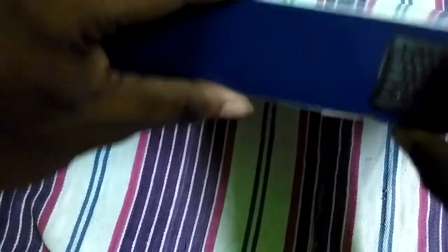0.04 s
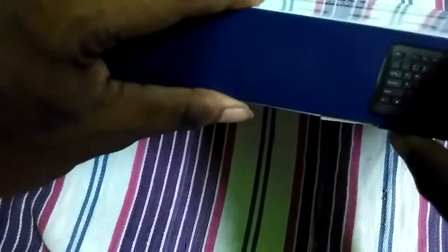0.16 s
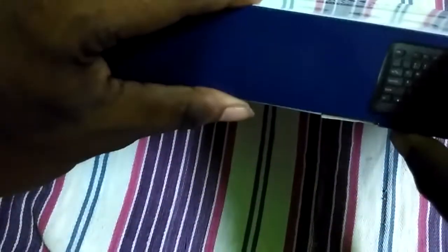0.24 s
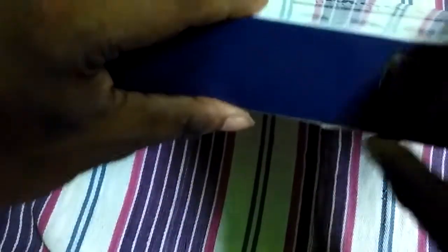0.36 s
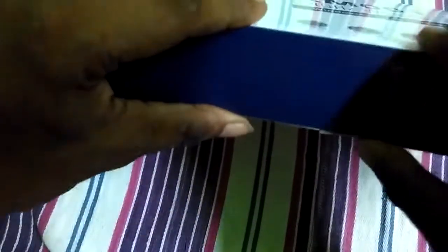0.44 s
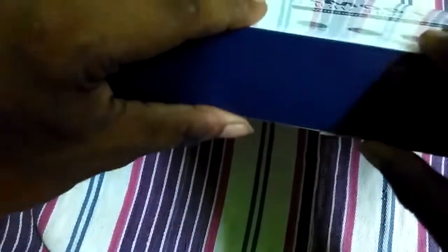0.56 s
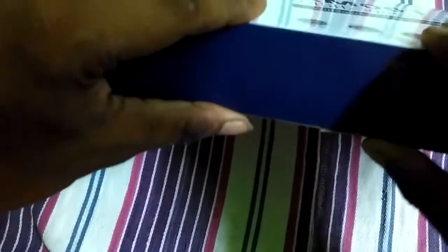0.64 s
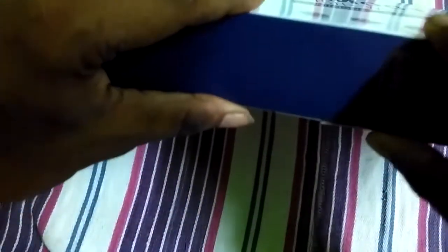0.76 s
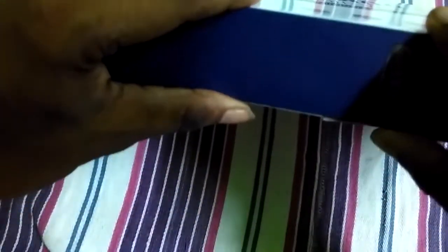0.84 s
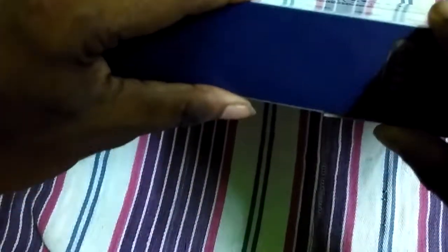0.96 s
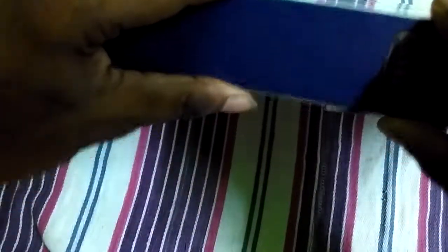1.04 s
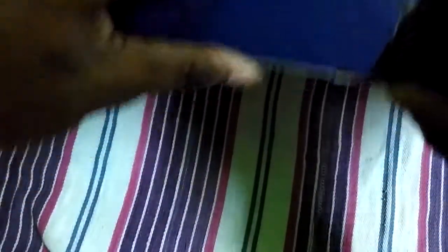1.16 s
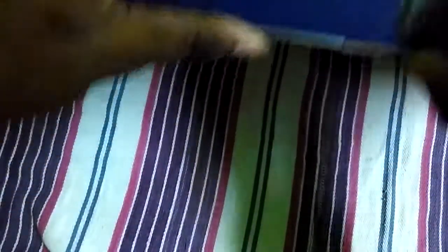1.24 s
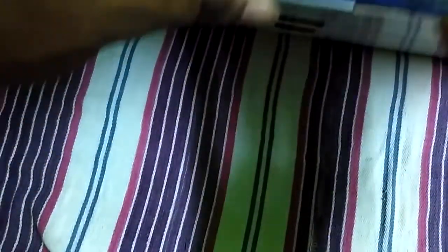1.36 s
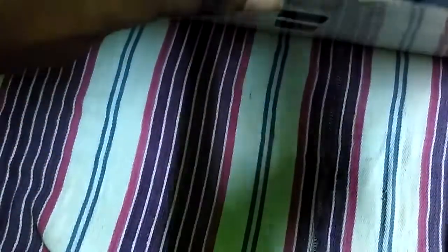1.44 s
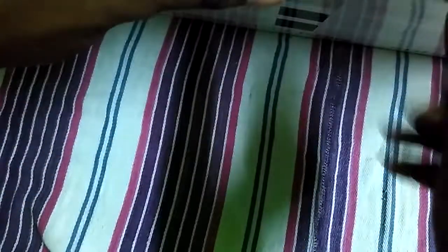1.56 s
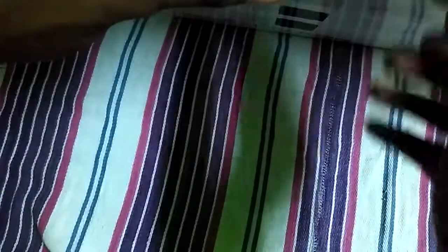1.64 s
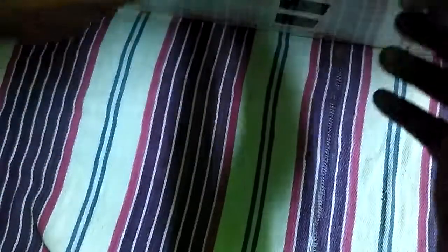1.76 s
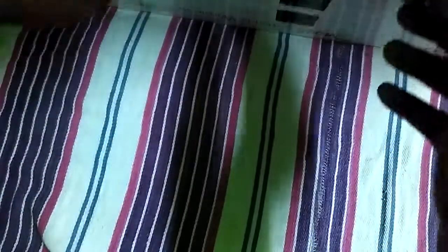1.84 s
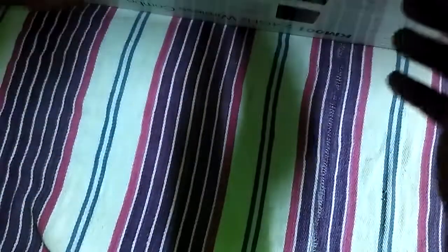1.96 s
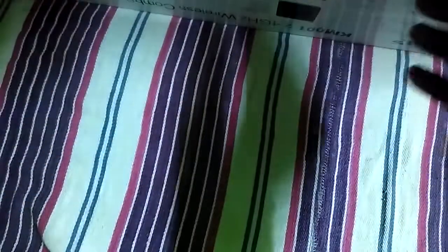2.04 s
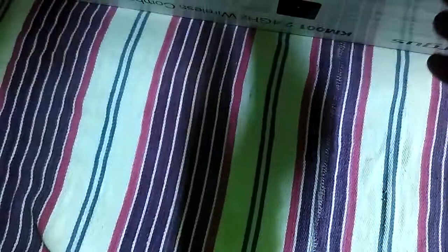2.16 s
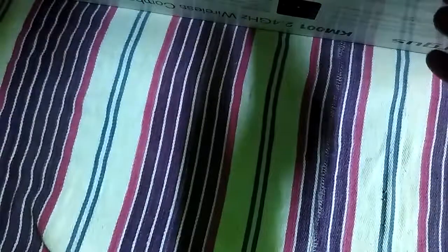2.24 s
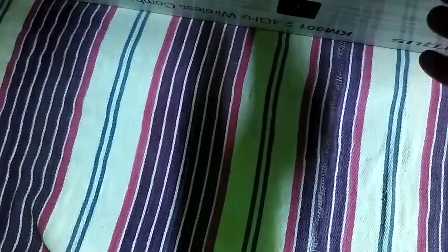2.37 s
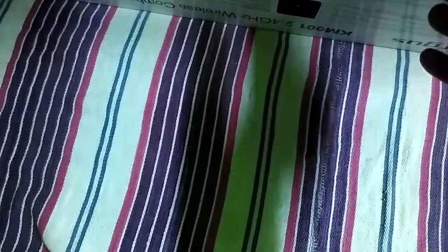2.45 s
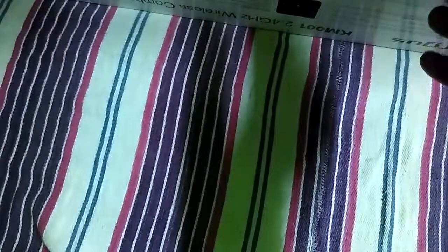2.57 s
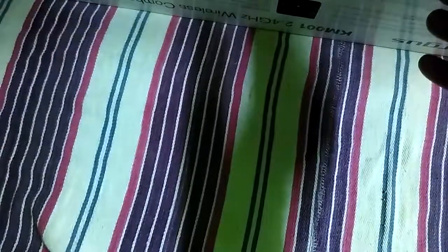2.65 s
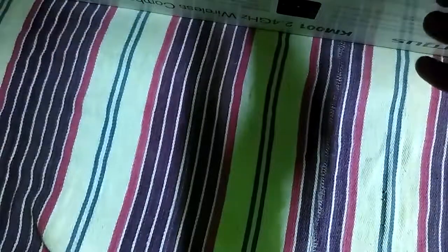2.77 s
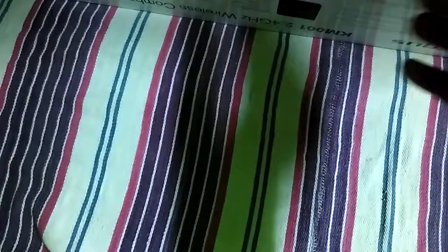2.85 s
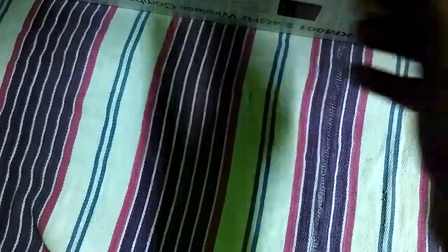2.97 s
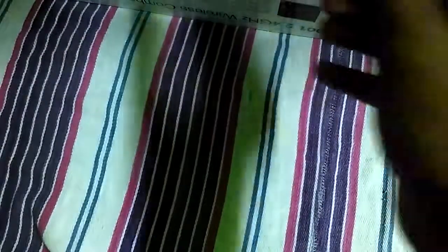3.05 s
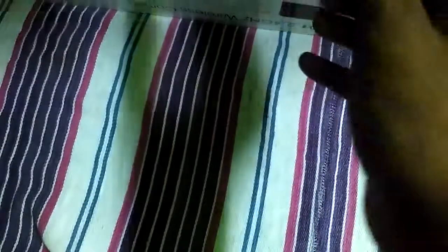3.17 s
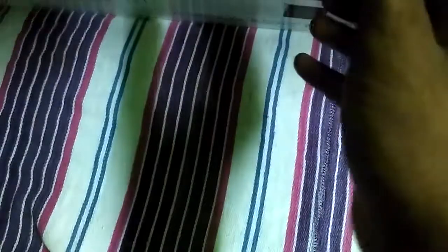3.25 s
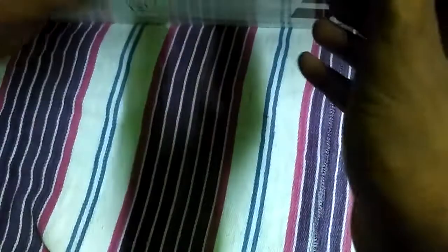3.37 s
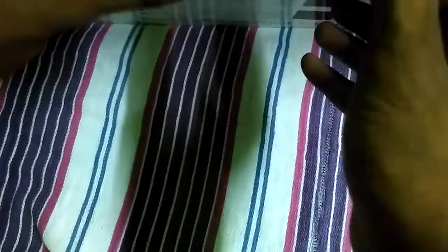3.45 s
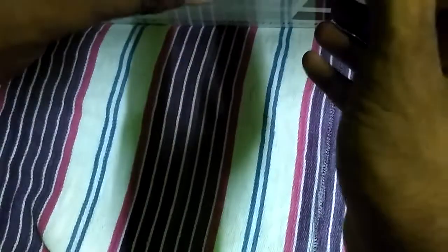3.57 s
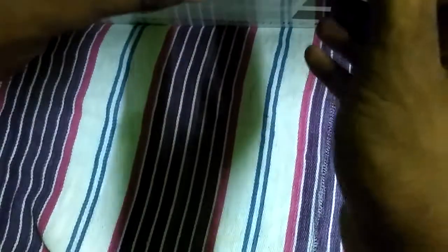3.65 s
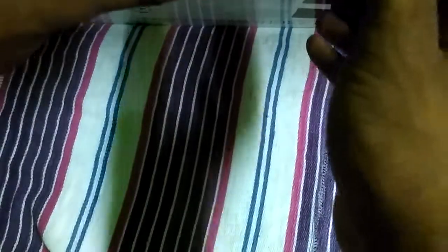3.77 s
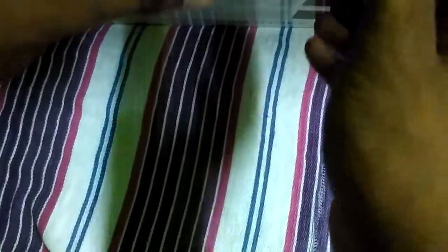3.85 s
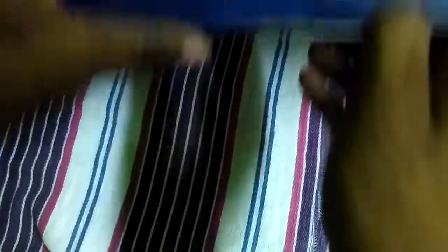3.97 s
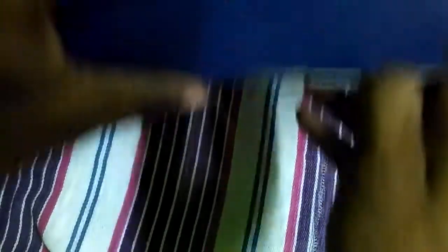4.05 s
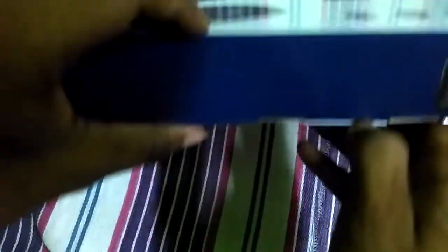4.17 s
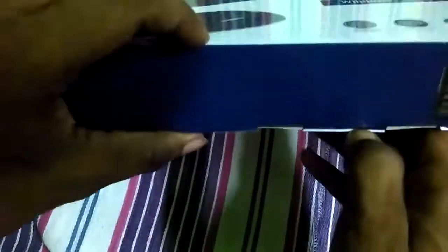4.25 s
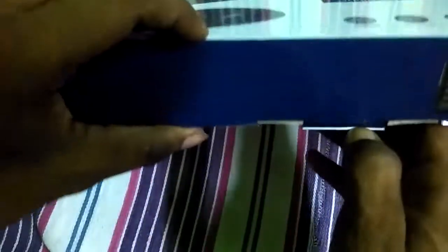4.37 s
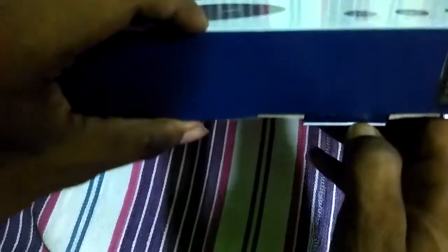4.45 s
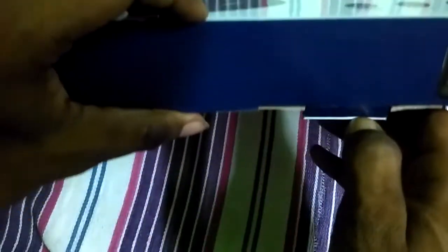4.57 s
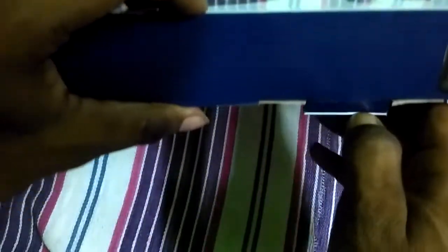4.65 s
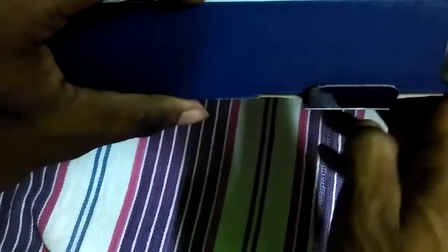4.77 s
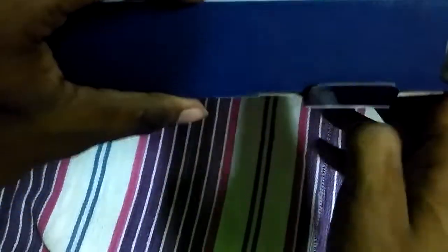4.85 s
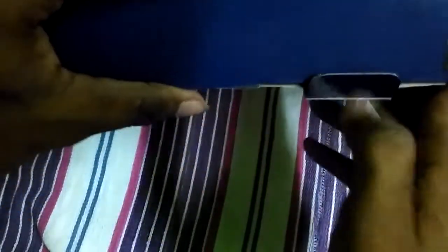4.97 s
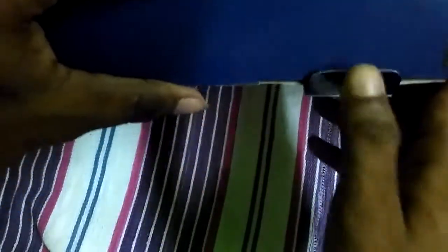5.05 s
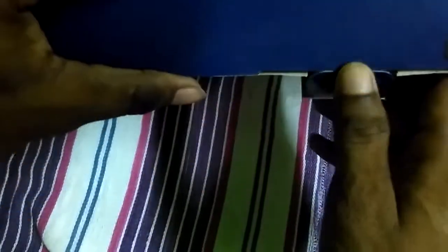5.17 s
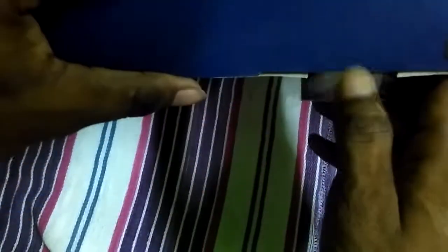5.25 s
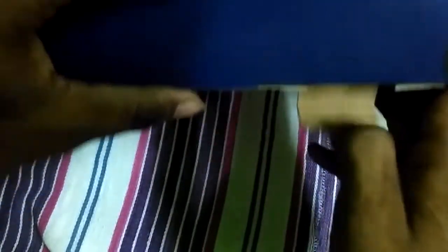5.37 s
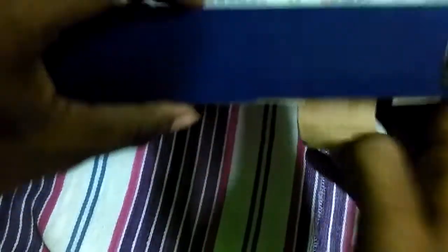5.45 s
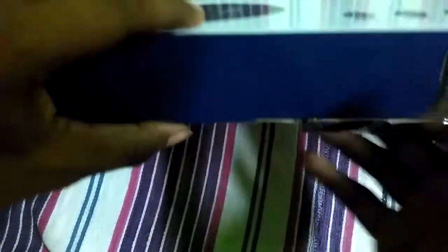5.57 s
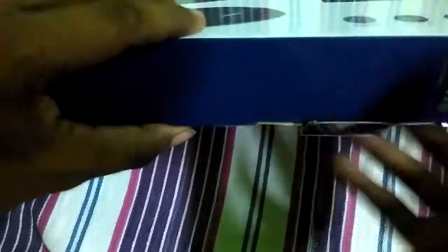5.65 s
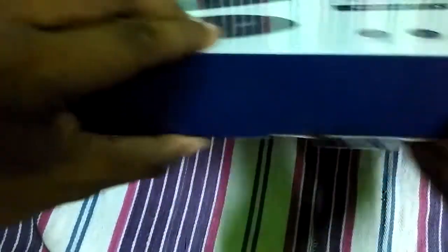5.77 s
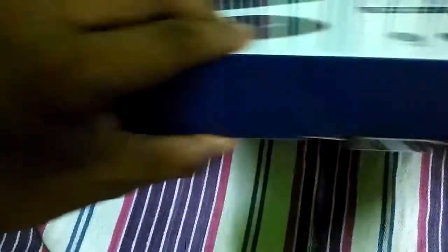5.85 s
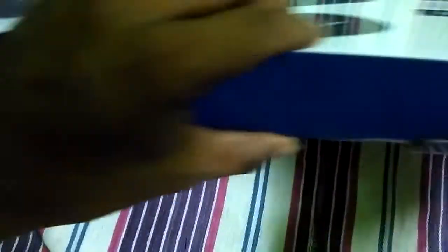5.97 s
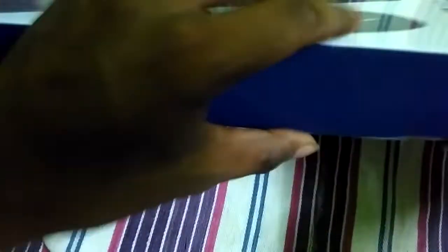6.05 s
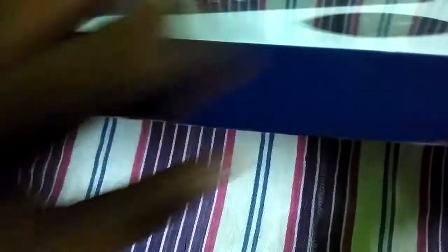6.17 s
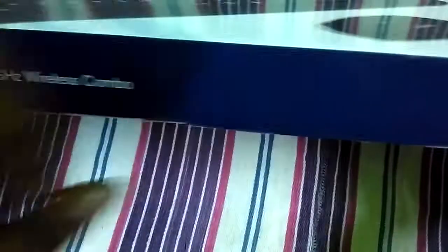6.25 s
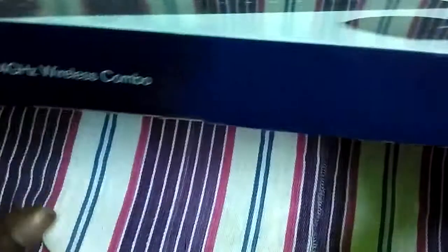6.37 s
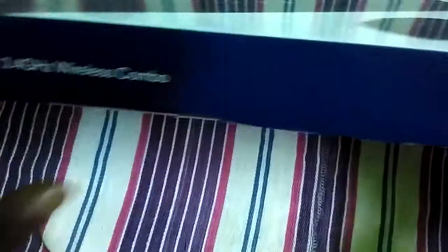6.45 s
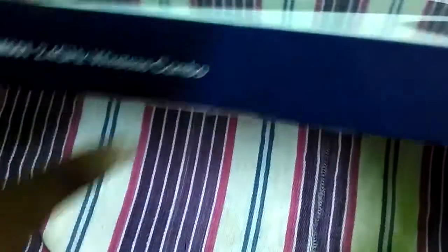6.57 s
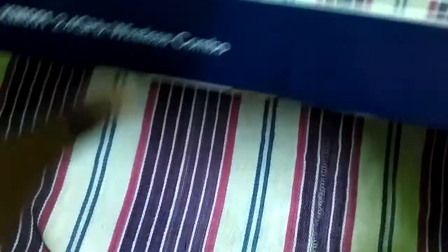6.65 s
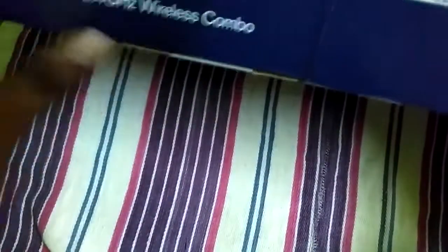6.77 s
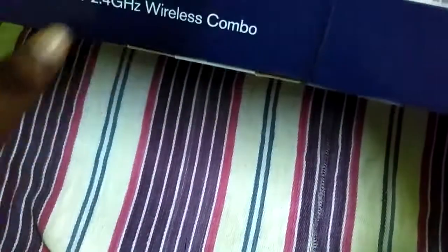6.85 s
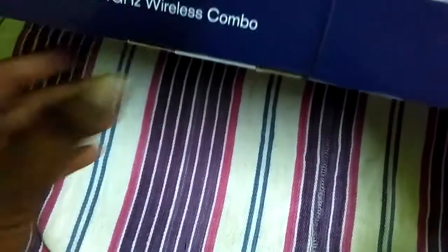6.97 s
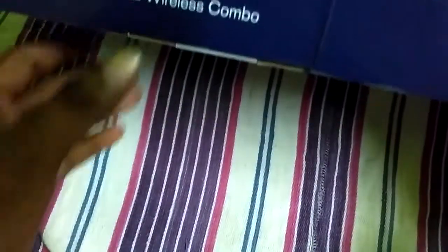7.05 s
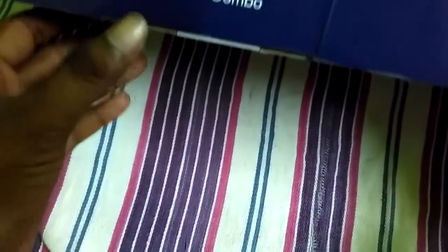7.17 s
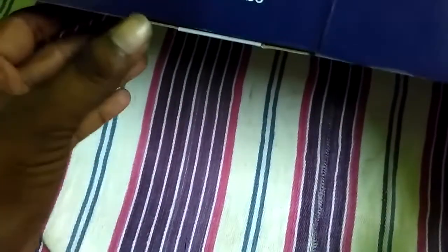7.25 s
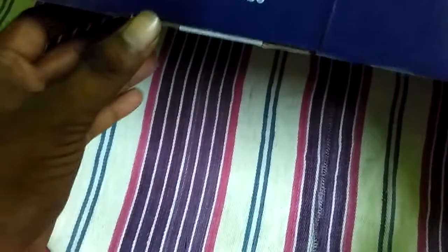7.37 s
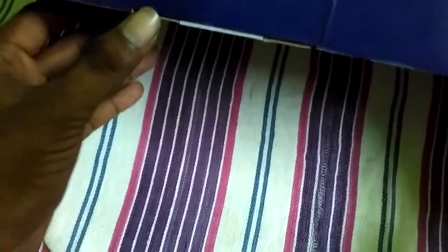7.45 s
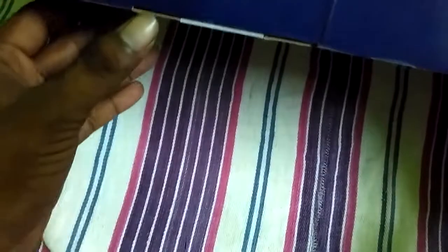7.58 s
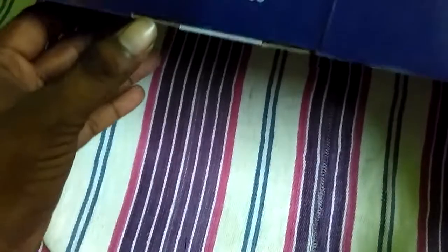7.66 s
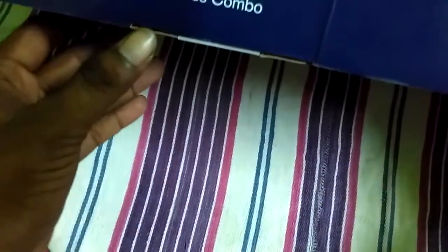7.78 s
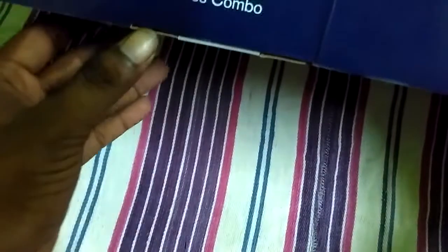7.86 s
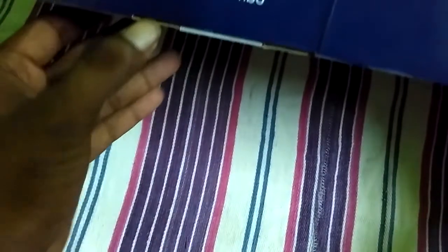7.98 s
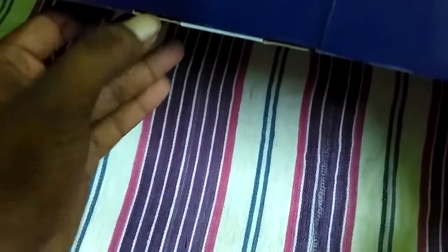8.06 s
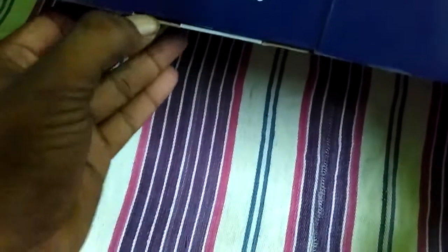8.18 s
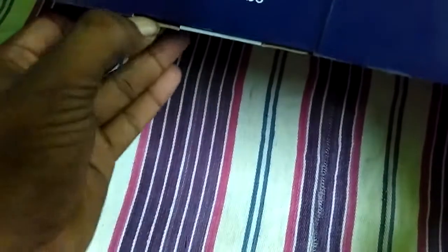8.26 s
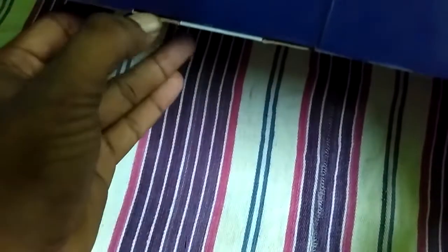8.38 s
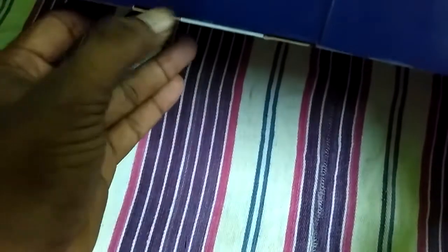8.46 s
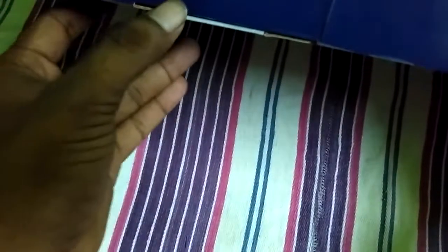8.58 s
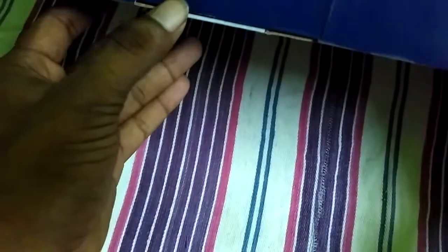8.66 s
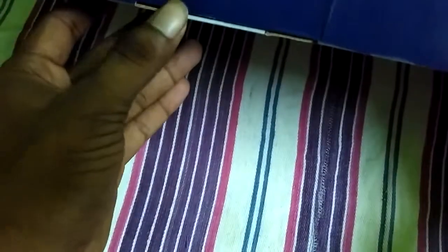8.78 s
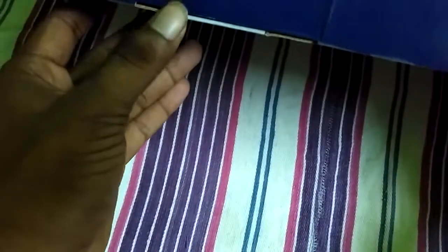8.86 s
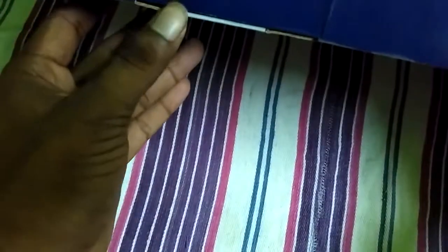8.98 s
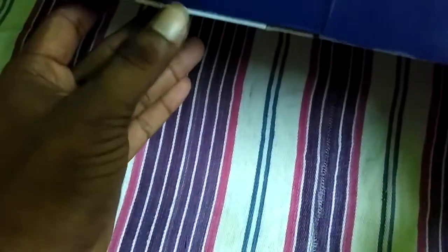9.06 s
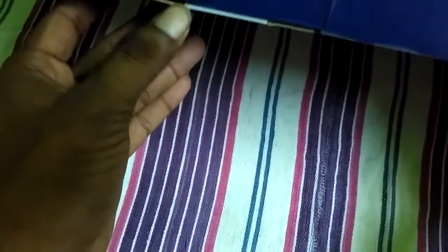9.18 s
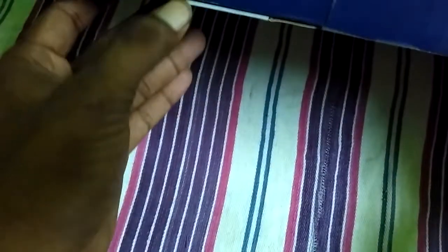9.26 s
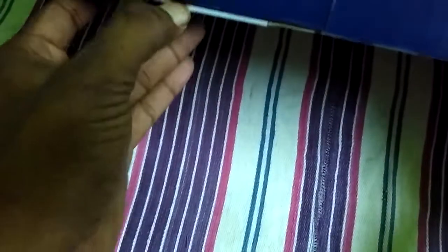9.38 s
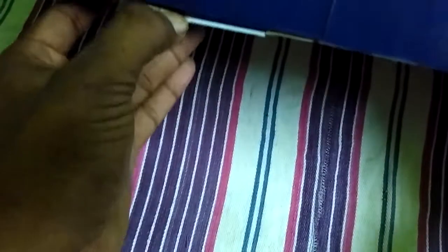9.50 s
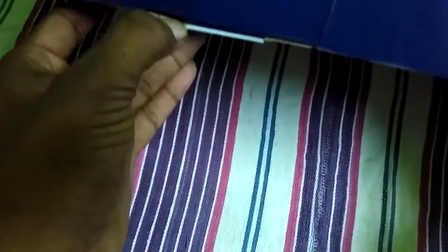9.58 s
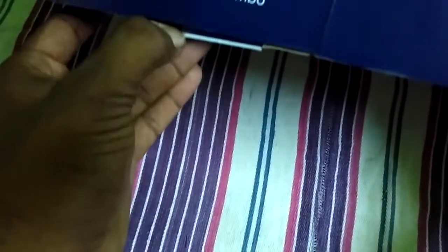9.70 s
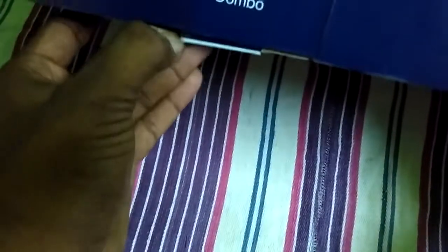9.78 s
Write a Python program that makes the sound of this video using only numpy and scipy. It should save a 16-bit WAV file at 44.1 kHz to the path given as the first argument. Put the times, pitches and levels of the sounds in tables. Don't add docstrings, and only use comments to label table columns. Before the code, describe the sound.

In a small room with a steady, throbbing low fan hum, hands turn a hollow cardboard box close to the microphone. Soft skin rubbing and nail ticks come first, then scattered hollow knocks. Midway a flap is dragged out with loud, gritty scrapes and cracks; later skin squeaks briefly and a fold creaks. After quieter touches, one hard blow lands near the end.

```python
import sys
import numpy as np
from scipy import signal
from scipy.fft import rfft, irfft, next_fast_len
from scipy.io import wavfile
from scipy.ndimage import uniform_filter1d

SR = 44100
rng = np.random.default_rng(int(sys.argv[2]) if len(sys.argv) > 2 else 0)


def boost_factor(decibels):
    exponent = np.asarray(decibels, float) / 20
    return 10 ** exponent


def generate_wav(signal):
    frames = np.transpose(np.atleast_2d(signal))
    scaled = np.clip(frames, -1, 1) * 32767
    pcm = np.round(scaled).astype(np.int16)
    wavfile.write(sys.argv[1], SR, pcm)


N = 433503

# [f/Hz, width/Hz, level/dB]
BOX_MODES = [
    (60.3, 16, -13),
    (141, 81, -7.5),
    (298, 120, 0),
    (473, 185, 3),
    (664.5, 393, 0),
    (997, 534, 1.5),
    (1214, 465, -1.5),
    (1900, 700, -10),
    (2590, 940, -10),
    (3600, 1100, -15),
]
# [f/Hz, level per Hz/dB]
SCRAPE_COLOUR = [(300, -28), (1500, -4), (2800, -11.5), (4000, -6.5), (5300, -4.5), (7000, -5.5),
                 (9000, -2.5), (12000, -3), (15000, -6.5)]
# [f/Hz, level per Hz/dB]
SKIN_COLOUR = [(1500, -27), (3200, -11), (6000, -8), (10000, -3), (13500, -5.5), (15500, -8)]
# [f/Hz, level per Hz/dB]
AIR_COLOUR = [(20, -30), (45, -8.5), (70, -4.5), (100, -4), (130, -2), (165, -3.5), (210, -11.5),
              (240, -14), (400, -19.5), (800, -31), (1400, -37), (4200, -50), (10900, -48), (14500, -40)]
# [f/Hz, width/Hz, level/dB]
MOTOR_LINES = [(292, 7.7, -80.5), (414.4, 20, -88.5), (539.2, 8.9, -85.5)]
# [f/Hz, share/1]
PORT_LIKENESS = [(60, 0.89), (130, 0.98), (300, 0.77), (650, 0.39), (1400, 0.13), (3000, 0.01)]
# [t/s, lag/ms]
HAND_PLACES = [(0, -0.052), (1.3, 0.075), (1.48, -0.079), (1.95, -0.12), (2.3, -0.054), (3.3, 0.066),
               (3.9, 0.0042), (4.02, 0.097), (4.4, 0.0099), (5.76, 0.084), (6.188, -0.029), (6.21, -0.2),
               (6.42, -0.22), (6.517, 0.17), (6.63, -0.27), (6.79, 0.18), (7.64, 0.088), (9.83, 0.16)]
# [t/s, crack level/dB, knock level/dB, crack left-right/dB]
EDGE_TICKS = [(0.1761, -22.5, -25, 8.5), (0.3151, -33.5, -55, 0), (3.7195, -33.5, -59, 7.5),
              (3.7882, -29, -49, -3), (3.9572, -34, -55, 3), (4.4149, -37.5, -50, 9), (4.4334, -30, -40, 4)]
# [t/s, crack level/dB, knock level/dB, crack left-right/dB]
SIDE_KNOCKS = [(0.4064, -57, -43.5, -5), (1.506, -29, -43.5, 10), (1.8812, -46, -50.5, 3),
               (1.9083, -28, -33, -15), (2.0763, -65, -57, 4), (3.8074, -37, -49, 7),
               (3.8239, -32, -42, -10), (3.8409, -27, -43.5, 3), (3.9953, -72, -49, 12),
               (4.798, -21, -25.5, 10), (4.8594, -17.5, -10.5, 20), (5.3842, -34.5, -27, 18),
               (6.1197, -37, -42.5, 13), (6.4057, -43.5, -42, -2), (6.6304, -48, -54, -9),
               (6.6412, -46.5, -44, 11.5), (7.6214, -70.5, -60, -8.5), (7.64, -29.5, -37, -5),
               (8.4821, -54, -47, -2.5), (8.5082, -46, -51.5, 12), (8.8913, -42.5, -49, 6.5),
               (8.9147, -32.5, -49, 6), (9.1905, -13.5, -12.5, -1.6), (4.8325, -24, -18, 11),
               (4.8055, -27, -40, 6), (6.126, -50, -44, 4), (4.517, -42, -45, 5), (5.991, -60, -58, 4),
               (5.966, -60, -60, 4)]
# [t/s, crack level/dB, knock level/dB, crack left-right/dB]
FACE_KNOCKS = [(1.305, -55, -43, 6), (1.4955, -38.5, -43, 12), (2.9146, -41.5, -46.5, -5),
               (4.0222, -50, -37.5, 13), (4.4553, -26.5, -34.5, 8), (4.5385, -29, -36, 5.5),
               (4.5908, -28, -33.5, 1), (4.6923, -20, -29, 0.5), (5.2715, -22.5, -32.5, -1),
               (5.3756, -46, -38, -9), (5.549, -42.5, -40, 12), (5.5663, -33.5, -41, 1),
               (5.5955, -29.5, -43, 5.5), (5.7565, -40, -40, -6), (6.0236, -48, -48, -9),
               (6.1393, -36, -36, -8), (6.3568, -32.5, -37.5, 2), (6.5237, -24.5, -23.5, 7),
               (6.76, -45, -47, -1.5), (6.7993, -31.5, -35.5, -6), (7.1827, -38, -40, 9),
               (8.0753, -48.5, -59, 7), (8.6284, -41.5, -36.5, 13.5), (9.169, -37, -39, -2.5),
               (9.1772, -24.5, -28, 2)]
# [t/s, crack level/dB, knock level/dB]
PAD_TOUCHES = [(0.092, -83, -49), (0.5296, -53, -43.5), (1.2094, -52.5, -67), (1.273, -60, -62),
               (1.5795, -55, -58), (1.7865, -50, -55.5), (1.9842, -47, -54), (2.2901, -66, -51),
               (2.341, -66, -61), (2.385, -67, -48), (2.4858, -47, -52), (2.904, -55, -56),
               (3.3018, -48, -45.5), (3.4324, -55.5, -51), (3.512, -60, -42.5), (4.0763, -65, -51),
               (5.6763, -51, -46.5), (5.8275, -58, -57), (5.9033, -48, -58), (6.9338, -63.5, -49.5),
               (7.238, -51, -47.5), (7.526, -74, -50), (7.775, -68.5, -48), (8.194, -59, -59.5),
               (8.346, -53, -57.5), (8.971, -55, -73.5), (9.4825, -54.5, -54.5), (9.5203, -52.5, -60),
               (9.5554, -70, -45.5)]
# [t/s, crack level/dB, knock level/dB, crack left-right/dB]
SNAPS = [(1.2853, -20.5, -36, 6.5), (1.2902, -39, -44, 4), (2.0158, -45.5, -54, 17), (2.1361, -53, -64, 13),
         (4.6737, -23, -25.5, 9.5), (4.78, -16.5, -25, 8.5), (5.217, -37.5, -57, -4), (4.5, -36, -53, 8),
         (5.7598, -23.5, -45, 13), (9.4317, -42, -66, 11), (6.6, -53, -70, 9), (3.876, -48, -64, 7),
         (1.7, -64, -64, 5)]
# [t/s, knock level/dB]
THUDS = [(0.1761, -37), (1.286, -42), (1.497, -43), (1.909, -41), (4.023, -45), (4.8, -36), (5.275, -37.5),
         (5.388, -33), (6.357, -39), (6.525, -41), (8.63, -47), (9.178, -35), (9.193, -26)]
# [t/s, pitch f/Hz]
OFF_CENTRE_SPOTS = [(.3151, 2300), (2.2901, 900), (3.512, 1080), (5.549, 1900), (5.6765, 2010),
                    (5.7598, 3870), (7.64, 1500), (1.2853, 2070), (1.506, 310), (1.9083, 895),
                    (4.0222, 447), (4.5385, 930), (4.5908, 940), (4.6737, 1080), (4.6923, 945),
                    (4.78, 1050), (5.2715, 1140), (5.3856, 1060), (6.3568, 397), (6.4057, 1245),
                    (6.5237, 800), (1.305, 1250), (6.6304, 1220), (6.6412, 1330), (6.7993, 1340),
                    (6.9336, 1520), (7.1827, 398), (7.2379, 1684), (8.4821, 1740), (8.5082, 1740),
                    (8.6284, 914), (9.169, 2380), (9.1912, 867)]
# [f/Hz, left-right/dB]
BOX_LEAN = [(300, 1), (600, 2), (1100, 4), (1600, 0.4), (2300, -1)]
# [start t/s, swell t/s, peak level/dB, share through the box/dB]
DRAGS = [(.182, 0.043, -44, -7.5), (0.403, 0.0071, -41.5, -16), (1.495, 0.012, -42.5, -6.5),
         (2.375, 0.033, -50, -1.5), (3.8, 0.05, -52, -6), (4.46, 0.025, -37, -8),
         (4.487, .025, -38.5, -7.5), (4.801, 0.03, -22, -14.5), (4.823, .008, -19, -13),
         (5.188, 0.081, -31.5, -1.5), (5.555, 0.05, -45, -4), (6.151, 0.042, -37, -4),
         (6.66, 0.037, -52.5, 1.5), (6.749, 0.021, -49.5, 5.5), (6.83, .063, -44.5, -9.5),
         (7.185, 0.023, -44, -9), (9.17, 0.012, -38.5, -0.5)]
# [start t/s, fade t/s, peak level/dB, share through the box/dB]
BRUSHES = [
    (0.531, 0.03, -67, 8),
    (.86, 0.21, -70, -11),
    (1.288, 0.066, -54.5, 9.5),
    (3.814, 0.0057, -53, -6),
    (4.03, .009, -46, -29),
    (5.76, 0.022, -43.5, -3.5),
    (6.226, .016, -58.5, 16),
    (6.362, 0.018, -59, 14),
    (9.554, 0.12, -72, 7),
]
# [t/s, delay/ms]
FLAP_BOUNCE = [(0, 0.59), (4.4, .62), (4.8, 0.65), (4.814, 0.58), (4.9, 0.54), (5.18, .92), (5.3, 0.85),
               (5.5, 0.58), (6.14, 0.61), (6.9, 0.74), (9.83, 0.65)]
# [fastest at t/s, half length t/s, skin hiss level/dB, card rumble level/dB]
SLIDES = [(0.068, 0.35, -69.5, -70), (0.431, 0.14, -63.5, -69.5), (1.4, 0.2, -64.5, -70.5),
          (1.609, 0.12, -81, -73.5), (1.995, 0.23, -68.5, -69.5), (2.3, 0.25, -80, -80),
          (2.545, 0.15, -63.5, -74), (3.37, 0.15, -59.5, -65), (3.78, 0.071, -64.5, -68.5),
          (4.034, 0.14, -63, -68), (4.545, 0.17, -68, -67), (4.71, 0.059, -67, -63),
          (5.05, 0.21, -73.5, -77), (5.435, 0.26, -70.5, -79), (5.818, 0.26, -63, -64.5),
          (6.072, 0.15, -54, -59), (6.26, 0.2, -62.5, -60.5), (6.57, 0.23, -61, -65.5),
          (6.82, 0.11, -58.5, -58.5), (7.103, 0.33, -76.5, -79), (7.662, 0.09, -69, -65.5),
          (8.3, .5, -75, -82.5), (8.977, 0.073, -66, -77.5), (9.275, 0.46, -73.5, -76.5),
          (9.6, 0.11, -78, -70.5)]
# [start t/s, length t/s, pitch f/Hz, level/dB, octave level/dB]
SQUEAKS = [
    (6.172, .025, 725, -37.5, -5),
    (6.2, 0.013, 865, -54, 7),
    (6.668, 0.032, 700, -51, -5),
]
# [start t/s, length t/s, first gap t/s, peak level/dB]
CREAKS = [
    (6.2198, .0145, .0028, -22.5),
    (6.2506, .0095, .0064, -25.5),
    (6.357, .0133, .0026, -29.5),
]
# [f/Hz, width/Hz, level/dB]
FOLD_MODES = [
    (725, 650, 0.5),
    (2050, 690, -2.5),
]

EDGE_HZ, SIDE_HZ, FACE_HZ, PAD_HZ, SNAP_HZ, THUD_HZ = 1865, 990, 560, 482, 700, 300
EDGE_T60_S, SIDE_T60_S, FACE_T60_S, SNAP_T60_S = 0.017, 0.017, 0.025, 0.0093
SOFT_T60_S = 0.053
SOFT_BELOW_DB, HARD_ABOVE_DB = -43, -46
PAD_PAN_DB = 3.5
RUSTLE_DB, RUSTLE_T60_S = -20, 0.077
FIRST_PUSH, PUSH_ATTACK_S = 1.3, 0.0015
FOCUS_DB_PER_OCTAVE = 3.5
SWELL_DB, SWELL_DB_PER_S, SLIP_S = 7, 86.5, 0.013
BRUSH_ATTACK_S, BRUSH_SWELL_DB = 0.0051, -1.5
BOUNCE_DB = -2.5
SLIDE_EDGE_DB, SLIDE_RISE = -7.5, 0.88
SQUEAK_WOBBLE, SQUEAK_ROUGH_DB = 0.051, 2
CREAK_SLOWING, CREAK_LOSS_DB_PER_S = 1.09, 398
AIR_DB, BLADE_HZ, BLADE_DB = -58, 21.8, 3.5
ECHO_S, ECHO_DB = 0.0096, -15.5
ROOM_DB, LOW_T60_S, HIGH_T60_S = -16, 0.29, 0.24
BUZZ_HZ, BUZZ_DB = 128.2, -75.5
PORT_HZ, PORT_WIDTH_HZ, PORT_DB, RIGHT_DULL_HZ = 10210, 2210, 13.5, 8500
CUTOFF_HZ, CAPSULE_DB = 14400, -74.5


def rms_one(x):
    return x / np.sqrt(np.mean(x ** 2) + 1e-20)


def at_hz(points, hz):
    points = np.array(points)
    return np.interp(np.log(hz), np.log(points[:, 0]), points[:, 1])


def filtered(x, kind, order, hz):
    return signal.sosfilt(signal.butter(order, hz, kind, fs=SR, output="sos"), x)


def drift(rate):
    r = np.exp(-80 * np.pi * rate / SR)
    slow = signal.lfilter([1], [1, -2 * r, r * r], rng.standard_normal(N // 40 + 2002))[2000:]
    return np.interp(np.arange(N) / 40, np.arange(len(slow)), rms_one(slow))


def resonate(x, hz, width_hz):
    r = np.exp(-np.pi * width_hz / SR)
    ring = [1, -2 * r * np.cos(2 * np.pi * hz / SR), r * r]
    return signal.lfilter([(1 - r * r) / 2, 0, (r * r - 1) / 2], ring, x)


def coloured(x, spectrum):
    size = next_fast_len(x.shape[-1])
    hz = np.maximum(np.fft.rfftfreq(size, 1 / SR), 1)
    shaped = irfft(rfft(x, size) * boost_factor(at_hz(spectrum, hz)), size)
    return rms_one(shaped[..., :x.shape[-1]])


def at_ports(shared, own):
    size = next_fast_len(len(shared))
    hz = np.maximum(np.fft.rfftfreq(size, 1 / SR), 1)
    alike = np.clip(at_hz(PORT_LIKENESS, hz), 0, 1)
    a = np.sqrt(1 + alike) * rfft(shared, size)
    b = np.sqrt(1 - alike) * rfft(own, size)
    return irfft(np.array([a + b, a - b]), size)[:, :len(shared)] / np.sqrt(2)


def grit(size, spread_db):
    unevenness = np.minimum(rng.exponential(1, size), 5)
    return rms_one(rng.standard_normal(size) * boost_factor(spread_db * unevenness))


def hollow(x, strength_db):
    return sum((-1) ** k * boost_factor(db + strength_db[k]) * resonate(x, hz, width)
               for k, (hz, width, db) in enumerate(BOX_MODES))


def fan():
    white = at_ports(*rng.standard_normal((2, N)))
    air = coloured(white, AIR_COLOUR)
    low = filtered(air, "low", 2, 260)
    turn = 2 * np.pi * np.cumsum(BLADE_HZ * (1 + 0.04 * drift(0.98))) / SR
    blades = np.cos(turn) + 0.4 * np.cos(2 * turn)
    throb = boost_factor(BLADE_DB * blades + 0.5 * drift(8)) - 1
    motor = sum(boost_factor(db) * rms_one(resonate(resonate(white, hz, width), hz, width))
                for hz, width, db in MOTOR_LINES)
    return boost_factor(AIR_DB) * (air + throb * low) + motor


def sliding():
    t, power = np.arange(0, N + 64, 64) / SR, 0
    for s, half, hiss_db, rumble_db in SLIDES:
        away = (t - s) / np.where(t < s, SLIDE_RISE * half, half)
        power = power + boost_factor(np.array([[hiss_db], [rumble_db]]) + SLIDE_EDGE_DB * away ** 2) ** 2
    return [np.interp(np.arange(N) / SR, t, np.sqrt(p)) for p in power]


def rubbing():
    hiss_gain, rumble_gain = sliding()
    hiss = coloured(rng.standard_normal((2, N)), SKIN_COLOUR)
    hiss = hiss * boost_factor(2 * drift(6.2)) * boost_factor([[0], [2.5]])
    catches = at_ports(grit(N, spread_db=5.5), grit(N, spread_db=4.5))
    card = hollow(catches, np.zeros(len(BOX_MODES)))
    rumble = rms_one(card) * boost_factor(3.5 * drift(25))
    return boost_factor(-4) * hiss_gain * hiss + boost_factor(0.5) * rumble_gain * rumble


def pitch_at(s, usual_hz):
    if usual_hz == THUD_HZ:
        return usual_hz
    return next((hz for at, hz in OFF_CENTRE_SPOTS if abs(at - s) < 0.0042), usual_hz)


def contacts():
    pads = [(*row, PAD_PAN_DB) for row in PAD_TOUCHES]
    thuds = [(s, -90, db, 0) for s, db in THUDS]
    parts = [(pads, PAD_HZ, FACE_T60_S), (EDGE_TICKS, EDGE_HZ, EDGE_T60_S), (thuds, THUD_HZ, FACE_T60_S),
             (SIDE_KNOCKS, SIDE_HZ, SIDE_T60_S), (SNAPS, SNAP_HZ, SNAP_T60_S),
             (FACE_KNOCKS, FACE_HZ, FACE_T60_S)]
    blows = []
    for rows, usual_hz, sharp_t60 in parts:
        for s, crack_db, knock_db, pan_db in rows:
            t60 = np.interp(crack_db, [SOFT_BELOW_DB, HARD_ABOVE_DB], [SOFT_T60_S, sharp_t60])
            blows.append((s, crack_db, knock_db, pitch_at(s, usual_hz), pan_db, t60))
    return blows


def crack_of(contact, aside, t):
    rustle = boost_factor(RUSTLE_DB - 60 * t / RUSTLE_T60_S)
    settling = rustle * grit(len(t), spread_db=3.5)
    common = boost_factor(-6) * rustle * rng.standard_normal(len(t))
    differing = (0.6 * aside + settling) * [[1], [-1]]
    return filtered(contact + common + differing, "band", 1, [2500, 10000])


def knock_of(push, hz, knock_db):
    modes_hz = np.array(BOX_MODES)[:, :1, None]
    count = len(BOX_MODES)
    strength_db = rng.normal(0, 1.6, (count, 1, 1)) + rng.normal(0, 1.1, (count, 2, 1))
    strength_db += 0.5 * at_hz(BOX_LEAN, modes_hz) * [[1], [-1]]
    strength_db[2:] -= FOCUS_DB_PER_OCTAVE * abs(np.log2(modes_hz[2:] / hz))
    strength_db[:2] += 0.45 * (knock_db + 30)
    lean = boost_factor(at_hz(BOX_LEAN, hz) * np.array([[0.5], [-0.5]]))
    panel = lean * resonate(push, hz, width_hz=220 + 0.26 * hz)
    return 1.095 * panel + 0.8 * hollow(push, strength_db)


def taps():
    size = 2048
    out, t = np.zeros((2, N + size)), np.arange(size) / SR
    for s, crack_db, knock_db, hz, pan_db, t60 in contacts():
        fade = boost_factor(-60 * t / np.clip(t60, 0.003, 0.05)) * np.minimum(t / 0.0003, 1)
        contact = grit(size, spread_db=2.5) * fade
        aside = grit(size, spread_db=5) * fade
        crack = crack_of(contact, aside, t)
        first = FIRST_PUSH * np.sqrt(np.sum(fade ** 2)) * (np.arange(size) == 8)
        push = contact * np.minimum(t / PUSH_ATTACK_S, 1) + first
        push = filtered(push, "low", 2, 500 + 1.8 * hz)
        knock = knock_of(push, hz, knock_db)
        crack *= boost_factor(crack_db - 9.5) / np.sqrt(uniform_filter1d(crack[0] ** 2, size=44).max())
        knock *= boost_factor(knock_db - 2.5) / np.sqrt(uniform_filter1d(knock[1] ** 2, size=110).max())
        pan = boost_factor([[0.5 * (pan_db - 8)], [0.5 * (-0.5 - pan_db)]])
        i = round(s * SR) - 10
        out[:, i:i + size] += pan * crack + knock
    return out[:, :N]


def stroke_shapes():
    shapes = []
    for s, swell, db, box_db in DRAGS:
        start_db = db - SWELL_DB - SWELL_DB_PER_S * swell
        shapes.append((s, s + swell, s + swell + SLIP_S, start_db, db, box_db))
    for s, fade, db, box_db in BRUSHES:
        peak = s + BRUSH_ATTACK_S
        shapes.append((s, peak, peak + fade, db - BRUSH_SWELL_DB, db, box_db))
    return shapes


def bounced(x):
    s, delay_ms = np.transpose(FLAP_BOUNCE)
    i = np.arange(N)
    late = i - np.interp(i / SR, s, delay_ms) * SR / 1000
    return x + boost_factor(BOUNCE_DB) * np.array([np.interp(late, i, side) for side in x])


def strokes():
    lumps = boost_factor(1.5 * drift(150))
    catches, aside = grit(N, spread_db=0) * lumps, grit(N, spread_db=4) * lumps
    edge, body = np.zeros(N), np.zeros(N)
    for start, peak, end, start_db, peak_db, box_db in stroke_shapes():
        i = np.arange(round(start * SR), round(end * SR))
        rise = np.clip((i / SR - start) / (peak - start), 0, 1) ** 1.6
        fall = np.clip((i / SR - peak) / (end - peak), 0, 1)
        gain = boost_factor(start_db + (peak_db - start_db) * rise - 16 * fall)
        edge[i] += gain
        body[i] += gain * boost_factor(box_db)
    differing = 1.9 * filtered(aside, "high", 2, 3000) * [[1], [-1]]
    scrape = edge * coloured(catches + differing, SCRAPE_COLOUR) * boost_factor(-6.5)
    ringing = hollow(catches + 0.073 * aside * [[1], [-1]], np.zeros(len(BOX_MODES)))
    knock = rms_one(ringing) * body
    return boost_factor(-2) * bounced(knock * boost_factor([[1.3], [-1.3]]) + scrape)


def squeaks():
    out, wobble, rough = np.zeros(N), drift(90), boost_factor(SQUEAK_ROUGH_DB * drift(120))
    for start, length, hz, db, octave_db in SQUEAKS:
        i = np.arange(round(start * SR), round((start + length) * SR))
        along = (i / SR - start) / length
        turn = 2 * np.pi * np.cumsum(hz * (1 + SQUEAK_WOBBLE * wobble[i])) / SR
        tone = np.sin(turn) + boost_factor(octave_db) * 2 * along * np.sin(2 * turn)
        out[i] += boost_factor(db) * rough[i] * np.sqrt(abs(np.sin(np.pi * along))) * tone
    return out * np.ones((2, 1))


def creaks():
    slips = np.zeros(N)
    chance = rng.uniform(-1, 1, (len(CREAKS), 2, 8))
    for (start, length, gap, db), (uneven, strength) in zip(CREAKS, chance):
        gaps = gap * CREAK_SLOWING ** np.arange(len(uneven)) * (1 + 0.05 * uneven)
        after = np.cumsum(gaps) - gaps
        slip_db = db + 18.5 - CREAK_LOSS_DB_PER_S * after + 1.8 * strength
        slips[((start + after) * SR).astype(int)] = boost_factor(slip_db) * (after < length)
    fold = sum(boost_factor(db) * resonate(slips, hz, width) for hz, width, db in FOLD_MODES)
    return filtered(fold, "low", 4, 3400) * boost_factor([[0.7], [-0.7]])


def left_lag(x):
    s, lag_ms = np.transpose(HAND_PLACES)
    i = np.arange(N)
    heard_at = i - np.interp(i / SR, s, lag_ms) * SR / 1000
    return np.array([np.interp(heard_at, i, x[0]), x[1]])


def room(x):
    t = np.arange(SR // 2) / SR
    noise = at_ports(*rng.standard_normal((2, len(t)))) * np.minimum(t / 0.002, 1)
    low = filtered(noise, "low", 1, 900)
    low_fade = boost_factor(-60 * t / LOW_T60_S)
    tail = low * low_fade + 1.035 * (noise - low) * boost_factor(-60 * t / HIGH_T60_S)
    tail = tail / np.sqrt(np.sum(low[0] ** 2 * low_fade ** 2)) / 2.3
    return signal.fftconvolve(x[None], tail, axes=1)[:, :N]


def scene():
    box = left_lag(taps() + strokes() + squeaks() + creaks())
    dull = signal.lfilter([0.3], [1, -0.7], box)
    echo = boost_factor(ECHO_DB) * np.roll(dull, round(ECHO_S * SR), axis=1)
    tail = boost_factor(ROOM_DB) * room(box.mean(axis=0))
    return fan() + rubbing() + box + echo + tail


def roll_off(x):
    return signal.sosfilt(signal.butter(12, 15490, fs=SR, output="sos"), x)


def record(dry):
    left = dry[0] + (boost_factor(PORT_DB) - 1) * resonate(dry[0], PORT_HZ, PORT_WIDTH_HZ)
    right = -filtered(dry[1], "low", 2, RIGHT_DULL_HZ)
    buzz = resonate(rng.standard_normal(N), BUZZ_HZ, width_hz=9.9)
    buzz = boost_factor(BUZZ_DB) * rms_one(resonate(buzz, BUZZ_HZ, width_hz=9.9))
    hiss = boost_factor(CAPSULE_DB) * rng.standard_normal((2, N))
    cut = signal.cheby2(10, 29, CUTOFF_HZ + 250, fs=SR, output="sos")
    mix = signal.sosfilt(cut, np.array([left, right]) + buzz + hiss)
    return roll_off(mix)


dry = scene()
out = record(dry)
generate_wav(out)
```